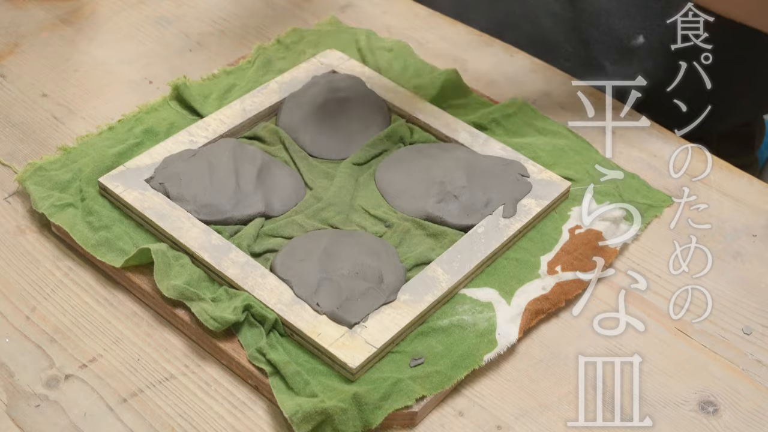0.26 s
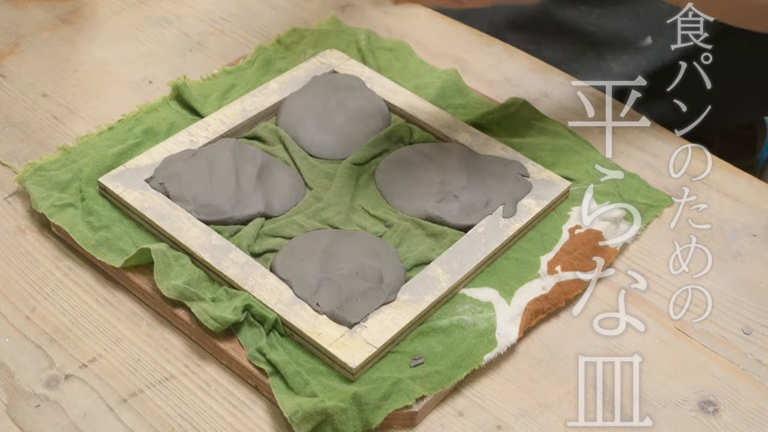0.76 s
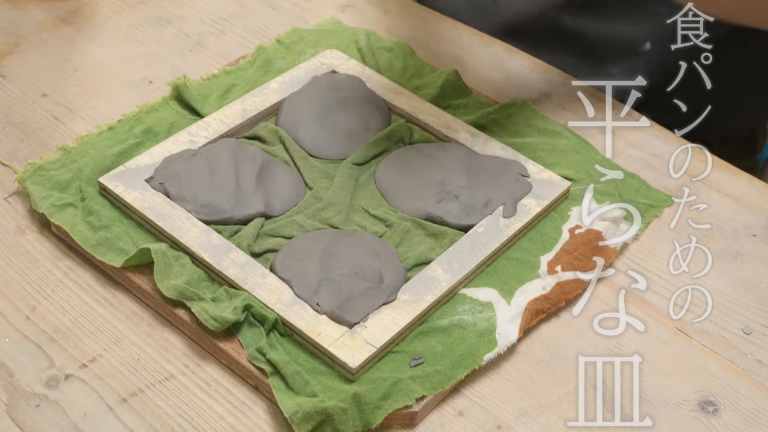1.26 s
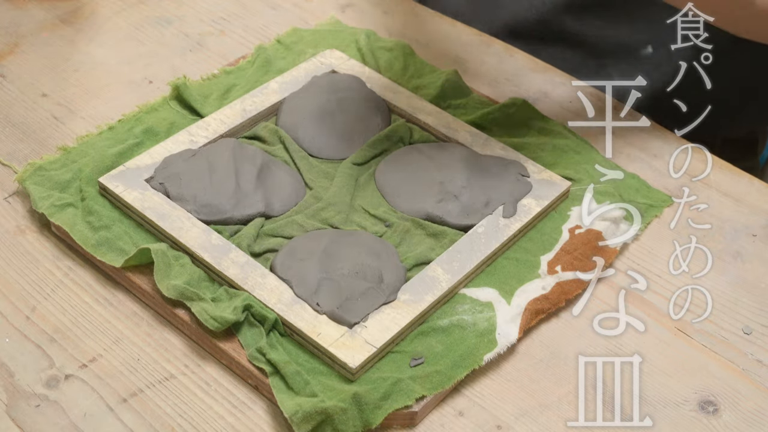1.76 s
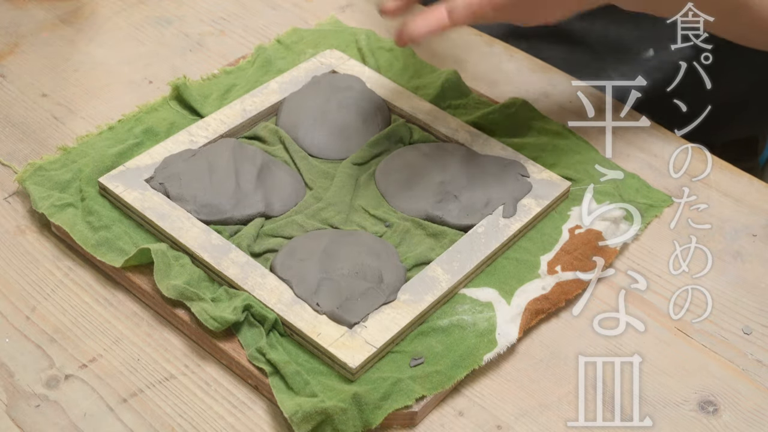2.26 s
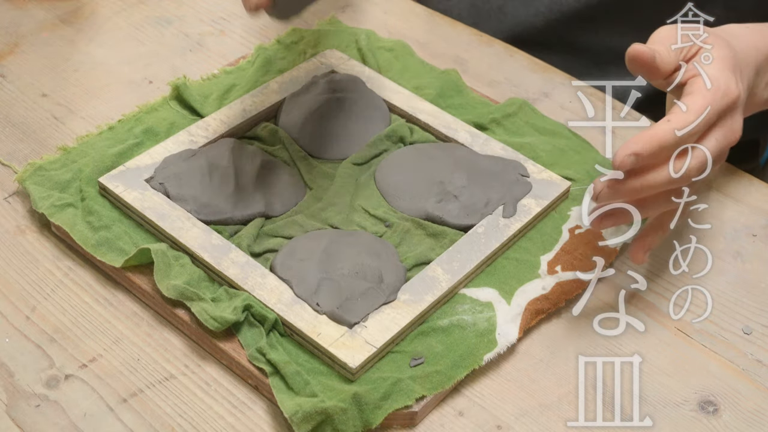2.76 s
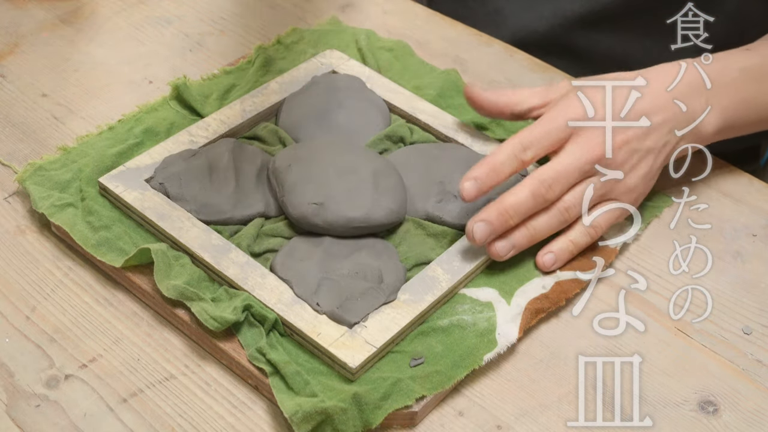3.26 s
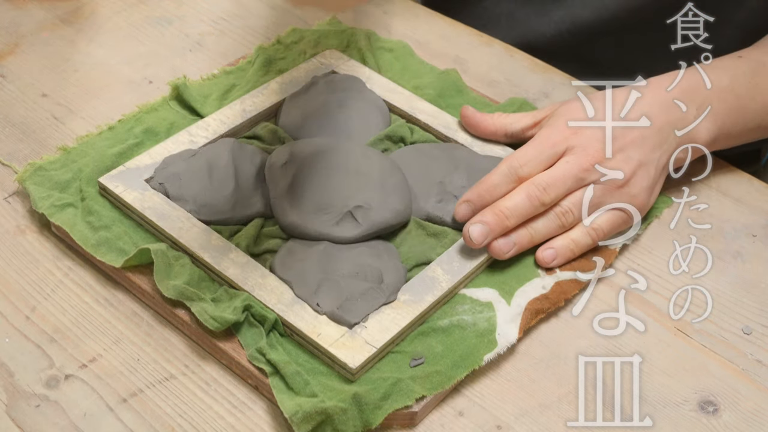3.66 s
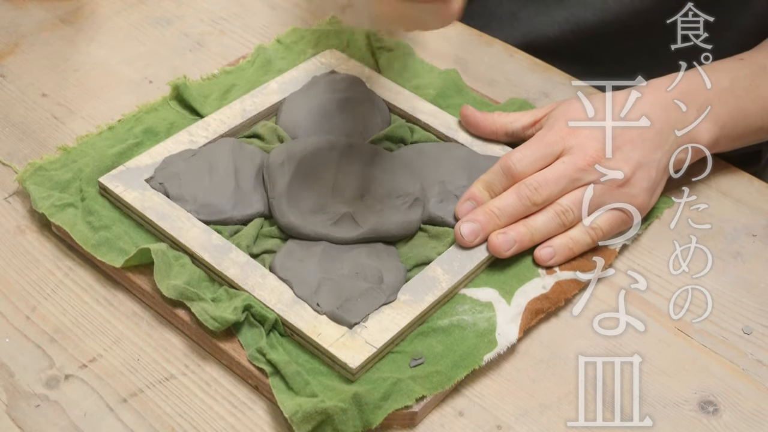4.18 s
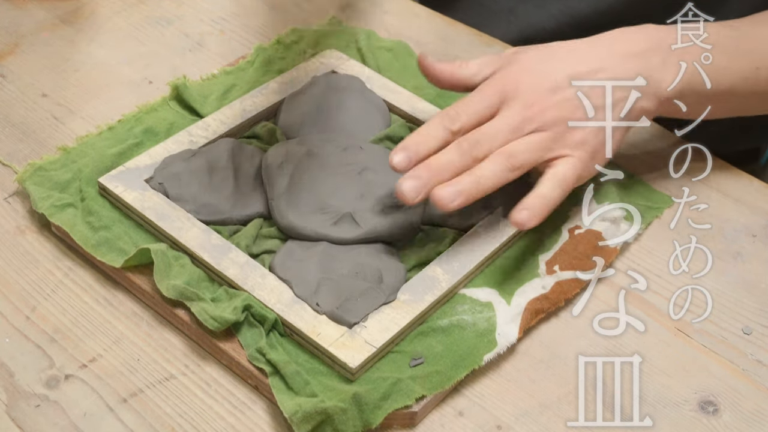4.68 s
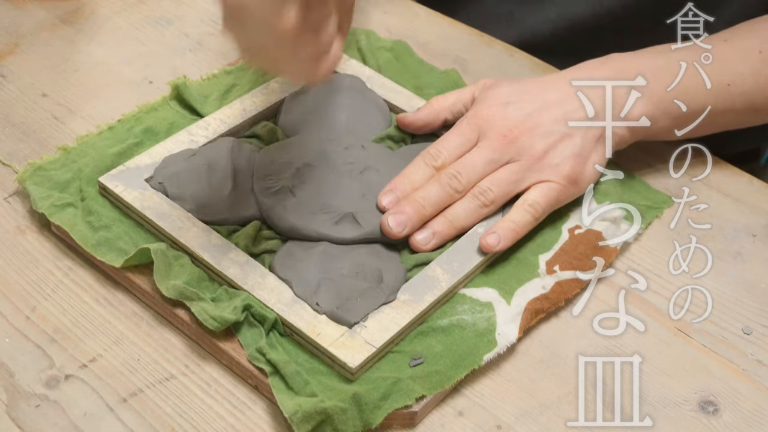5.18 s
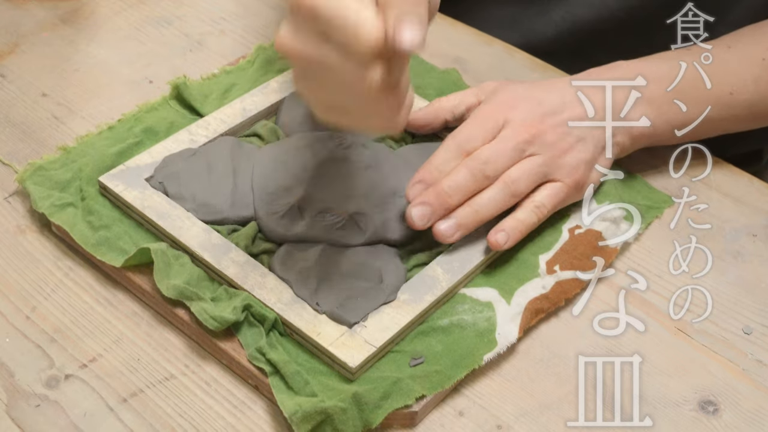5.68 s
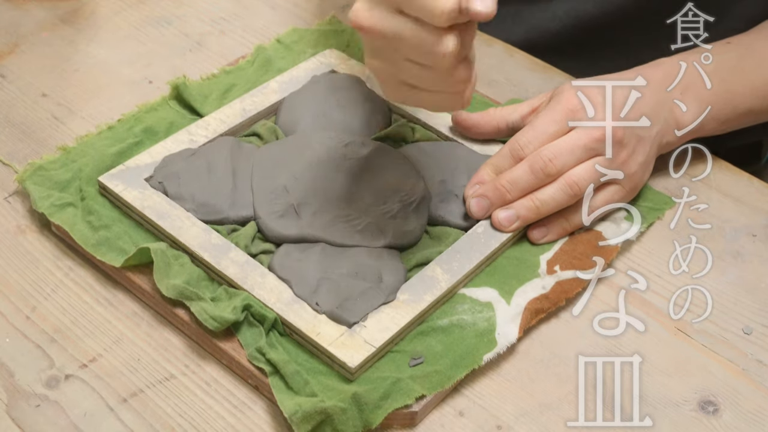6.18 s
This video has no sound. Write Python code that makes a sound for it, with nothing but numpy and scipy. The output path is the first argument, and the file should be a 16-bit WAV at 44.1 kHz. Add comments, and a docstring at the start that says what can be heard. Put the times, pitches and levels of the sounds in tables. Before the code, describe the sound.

In a small, quiet workshop, heard from nearby, bare hands clap a piece of damp clay into shape with a brisk run of cracking slaps, the loudest near the end. Skin peels softly off the clay, and the lump is slapped onto a wooden table. Steady fist blows follow, about four a second, lower and duller than the slaps, each with a wooden boom and a brief chatter of loose objects.

```python
"""Ten sharp slaps shape a lump of soft clay between the palms, over the hush of a small workshop.
Each is air squeezed from a closing gap, coloured by the cavity resonance of the palm; sticky skin peels off.
The lump is slapped onto a wooden table and pounded with the fist: trapped air pops, the table booms in its
normal modes and loose things on it rattle. The cracks overload a limiter, whose recovering gain lets the
room's reverberation swell after each."""
import sys
import numpy as np
from scipy import signal
from scipy.fft import rfft, irfft
from scipy.io import wavfile

SR = 44100
rng = np.random.default_rng(int(sys.argv[2]) if len(sys.argv) > 2 else 0)


def unload_wav(signal):
    """Save mono or channel-first audio to the path in sys.argv[1] as 16-bit WAV at rate SR, clipped to [-1, 1]."""
    wavfile.write(
        sys.argv[1],
        SR,
        np.round(np.clip(np.atleast_2d(signal).T, -1, 1) * 32767).astype(np.int16),
    )


N = 283563
HIT = np.arange(2 ** 15) / SR   # time since a contact [s]
HZ = np.maximum(np.arange(len(HIT) // 2 + 1) * SR / len(HIT), 1)

# room tone: (frequency [Hz], relative spectral density [dB])
AIR_SPECTRUM = [(24, -61), (40, -18), (91, -14.5), (196, -14.5), (277, -13.5), (306, -10), (568, -25.5),
                (728, -18.5), (1060, -31), (4790, -35.5), (6780, -35), (9130, -38.5), (15000, -39.5)]
# palm on the lump; two slaps land in two parts:
# (time [s], level [dB], treble cutoff [Hz], cavity resonance [Hz], cupping [0-1])
PALM_CONTACTS = [(.1060, -10, 12900, 230, 0.72), (.1101, -5.5, 3970, 1870, 1),
                 (.3650, 2.5, 10270, 3897, 0.2), (0.5953, 1.5, 8100, 2430, .65),
                 (.8079, -8, 11000, 2280, 0), (0.8125, -1.5, 5000, 2130, .9),
                 (1.0204, 5.5, 9500, 2330, .35), (1.2284, 4.5, 9000, 2230, 0.64),
                 (1.456, 6, 7160, 1690, 0.25), (1.6750, 6.5, 12000, 2430, 0.21),
                 (1.9174, 17.5, 7345, 3950, 0), (2.1438, 8.5, 13000, 6300, 0.23)]
# reverberation of the workshop: (frequency [Hz], relative spectral density [dB], T60 [s])
ROOM_DECAY = [(64.8, -10.5, 0.16), (138, -1.5, 0.15), (260, 4.5, 0.14), (710, 1.5, 0.17), (1120, -2, 0.15),
              (2300, -1.5, 0.16), (5000, 4.5, 0.15), (9000, 5.5, 0.14), (16200, 3, .14)]
# standing waves and gaps in the reverberation: (frequency [Hz], quality factor [1], boost [dB])
ROOM_RESONANCES = [(234, 9, 4), (290, 8.6, -9), (352, 8.6, 2.5), (820, 5, 5), (1110, 6, -7)]
# sticky skin leaving the clay: (time [s], level [dB], centre frequency [Hz], length [s])
SKIN_PEELS = [(.214, -49.5, 8500, 0.013), (.678, -49, 8500, 0.011), (2.421, -45.5, 2600, .022),
              (2.872, -56, 2400, .003), (3.308, -50.5, 2680, 0.0032)]
# light pats of the hand: (time [s], skin level [dB], thud level [dB])
HAND_PATS = [(2.385, -30.5, -36), (4.757, -46, -34.5), (4.783, -56, -27.5)]
# skin striking the clay on the table: (frequency [Hz], relative spectral density [dB])
SMACK_SPECTRUM = [(400, 7.5), (1500, -2.5), (4000, -4), (7000, -14.5), (12000, -15.5), (16000, -9)]
# normal modes of the loaded table: (frequency [Hz], relative level [dB], T60 [s])
TABLE_MODES = [(43, -9, 0.53), (78, -0.5, 0.12), (87.8, -8, 0.39), (115.1, -11.5, 0.55), (145.7, -6, 0.25),
               (173.5, 1.5, 0.24), (237.7, 2.5, 0.21), (263.5, -11.5, 0.25), (351, -9.5, 0.099),
               (394, -13.5, 0.22), (453.3, -5, 0.17), (540, -4.5, 0.053), (647, -6, 0.03), (761, 0, 0.029),
               (885.6, -5, 0.068)]
# the shaken table top and its load: (frequency [Hz], relative spectral density [dB], T60 [s])
SHUDDER_DECAY = [(60.7, -5, .5), (154, 2, 1), (430, 4, 0.68), (800, -7, 1), (1047, -10.5, 0.7),
                 (3170, -20, 0.62), (6960, -36.5, 0.82), (14760, -29.5, 0.1)]
# fist on the clay: (time [s], push level [dB], knock level [dB], smack level [dB], smack cutoff [Hz])
FIST_BLOWS = [(3.445, -11.5, -14, -10, 9000), (3.771, -13.5, -28, -16.5, 6000),
              (4.031, -14.5, -28.5, -25, 8000), (4.279, -16.5, -13.5, -12, 13000),
              (4.498, -16, -13, -8.5, 6380), (4.8062, -20, -18.5, -40, 10000),
              (5.051, -15.5, -13.5, -18, 11000), (5.315, -16, -14, -12.5, 9000),
              (5.556, -16, -23.5, -11, 14500), (5.792, -15.5, -31.5, -22.5, 9000),
              (6.036, -13, -22, -19, 10000), (6.2684, -16, -30, -24.5, 8000)]
# loose things landing after a blow: (delay [s], relative level [dB], decay time [s], resonance [Hz])
LOOSE_BOUNCES = [(0.015, -20, 0.0083, 12500), (.043, 2, 0.015, 2130), (.068, -6, 0.039, 3700),
                 (.074, -3.5, .01, 6000), (.111, -2, 0.0087, 10000)]
# their chatter: (frequency [Hz], relative spectral density [dB])
RATTLE_SPECTRUM = [(300, 17), (800, 9), (1300, -2.5), (2300, -2), (3200, -7), (5500, -6.5), (10000, -18),
                   (16000, -34)]
# resonances shared by all bounces: (frequency [Hz], quality factor [1], boost [dB])
RATTLE_RESONANCES = [(1770, 10, 5), (2400, 12, 3.5), (2980, 5.8, -2.5), (3560, 12, 5), (5790, 5.9, 0.5),
                     (10000, 18, 0.5)]

CRACK_S, THUD_S = .003, .04   # opening stretches over which levels are set


def from_db(db):
    """Amplitude ratio: tenfold for every 20 dB."""
    return 10 ** (np.asarray(db) / 20)


def at_level(x, db, seconds):
    """Normalisation: the opening stretch of a sound is given this rms level."""
    return x * from_db(db) / np.sqrt(np.mean(x[:int(seconds * SR) + 1] ** 2) + 1e-20)


def add(track, s, x):
    """Superposition: a sound adds to the track from time s on."""
    start = int(s * SR)
    track[start:start + len(x)] += x[:max(N - start, 0)]


def band(x, low_hz, high_hz):
    """Causal band-pass filter."""
    sections = signal.butter(2, [low_hz, min(high_hz, SR * 4 / 9)], "band", fs=SR, output="sos")
    return signal.sosfilt(sections, x + 1e-18)


def low_pass(x, top_hz, order=2):
    """Causal treble cut."""
    return signal.sosfilt(signal.butter(order, min(top_hz, SR * 4 / 9), fs=SR, output="sos"), x + 1e-18)


def high_pass(x, low_hz, order=2):
    """Causal bass cut."""
    return signal.sosfilt(signal.butter(order, low_hz, "high", fs=SR, output="sos"), x + 1e-18)


def resonate(x, hz, q, db):
    """Resonance lifts, or antiresonance lowers, the spectrum around one frequency."""
    return x + (from_db(db) - 1) * signal.lfilter(*signal.iirpeak(hz, q, fs=SR), x + 1e-18)


def colour(x, points):
    """Spectral shaping by a curve through (frequency [Hz], gain [dB]) points."""
    hz, db = np.transpose(points)
    bins = np.maximum(np.arange(len(x) // 2 + 1) * SR / len(x), 1)
    return irfft(rfft(x) * from_db(np.interp(np.log(bins), np.log(hz), db)), len(x))


def dying_noise(rows):
    """Frequency-dependent damping: each half-octave band of noise decays at its own rate."""
    hz, db, t60 = np.transpose(rows)
    white, out = rfft(rng.standard_normal(len(HIT))), 0
    for centre in 40 * 2 ** np.arange(0, 9, .5):
        part = irfft(white * (np.abs(np.log2(HZ / centre)) < 1 / 4))
        level, decay = (np.interp(np.log(centre), np.log(hz), column) for column in (db, t60))
        out = out + part * from_db(level - 60 * HIT / decay)
    return out


def room_tone():
    """Stationary noise: a quiet hush, strongest at low frequencies."""
    return at_level(colour(rng.standard_normal(N), AIR_SPECTRUM), db=-51, seconds=N / SR)


def palm_slaps(fizz_db=-19, thump_db=-24, thump_db_per_db=1.5):
    """Cavity resonance: the more the palm is cupped, the more its hollow rings and the more air puffs."""
    out = np.zeros(N)
    for s, db, top_hz, hollow_hz, cup in PALM_CONTACTS:
        hollow_db = np.interp(cup, [0, 1], [6.5, 14])
        puff_db = np.interp(cup, [0, 1], [-1, 24.5])
        crack = low_pass(air_burst(.003), top_hz, order=4) + from_db(fizz_db) * air_burst(.0012)
        crack = high_pass(crack, low_hz=110, order=1)   # a hand is too small to radiate deep bass
        crack = resonate(crack, hollow_hz, q=3.0, db=hollow_db)
        crack = resonate(crack, hz=320, q=1.1, db=puff_db)
        crack = resonate(crack, hz=2050, q=3.3, db=3)   # the crease of the palm
        crack = workshop(at_level(crack, db, CRACK_S), wet_db=-6.5)
        add(out, s, crack + flesh_thump(thump_db + thump_db_per_db * db))
    return out


def air_burst(seconds, size=1024):
    """Broadband transient: air squeezed out of a closing gap makes a brief, rough click."""
    fade = np.exp(-(HIT[:size] / seconds) ** 4)
    x = rng.standard_normal(size)
    for _ in range(8):   # flatten the spectrum while keeping the click short
        spectrum = rfft(x * fade)
        x = irfft(spectrum / (np.abs(spectrum) + 1e-9))
    return np.pad(x * fade, (0, len(HIT) - size))


def flesh_thump(db, hz=100, decay_s=0.0072):
    """Heavily damped oscillation: the lump jolts the holding hand through one or two dull swings."""
    return from_db(db) * np.sin(2 * np.pi * hz * HIT) * np.exp(-HIT / decay_s)


def workshop(x, wet_db, first_echo_s=0.0032, far_wall_s=0.025, far_wall_db=3.0):
    """Reverberation: dense reflections swell as the far walls answer, in a new pattern at every spot."""
    onset = 1 - np.exp(-(HIT / first_echo_s) ** 2)
    swell = from_db(-far_wall_db * np.exp(-(HIT / far_wall_s) ** 2))
    tail = dying_noise(ROOM_DECAY) * onset * swell
    for hz, q, boost_db in ROOM_RESONANCES:
        tail = resonate(tail, hz, q, boost_db)
    return x + from_db(wet_db) * signal.fftconvolve(x, tail / np.sqrt(np.sum(tail ** 2)))[:len(x)]


def touches():
    """Light impact and adhesion: a pat is a tick of skin and a soft thud; sticky fingers peel free."""
    out = np.zeros(N)
    for s, skin_db, thud_db in HAND_PATS:
        tick = rub(skin_db, low_hz=1500, high_hz=6960, seconds=0.0098)
        thud = rub(thud_db, low_hz=85, high_hz=380, seconds=.015)
        add(out, s, tick + thud)
    for s, db, hz, length in SKIN_PEELS:
        add(out, s, rub(db, hz / np.sqrt(2), hz * np.sqrt(2), length))
    return out


def rub(db, low_hz, high_hz, seconds):
    """Friction noise: a brief brush of skin on clay."""
    brush = rng.standard_normal(len(HIT)) * np.exp(-(HIT / seconds) ** 2)
    return at_level(band(brush, low_hz, high_hz), db, seconds)


def lump_drop(at_s=2.9501, damping_s=0.19):
    """Damped impact: the lump lands flat and all at once, and the palm stays on it and damps the table."""
    out = np.zeros(N)
    drop = clay_blow(push_db=-14.5, knock_db=-13.5, smack_db=-3.5, pop_db=-2,
                     sink_s=.00093, top_hz=4170, push_s=.004)
    add(out, at_s, drop * np.exp(-HIT / damping_s))
    return out


def clay_blow(push_db, knock_db, smack_db, pop_db, sink_s, top_hz, push_s):
    """Inelastic impact: the clay yields and pushes the table; after sink_s the hand bottoms out."""
    push_force = np.sin(np.pi * np.minimum(HIT / push_s, 1)) ** 2
    knock_force = band(1.0 * (HIT == 0), low_hz=215, high_hz=1300)
    smack = workshop(skin_smack(smack_db, top_hz), wet_db=-14)
    boom = workshop(table_ring(push_force, push_db, damping_s=0.31), wet_db=-13)
    pop = workshop(air_pop(pop_db), wet_db=-9)
    knock = workshop(table_ring(knock_force, knock_db, damping_s=0.049), wet_db=-8)
    thud = clay_thud(knock_db - 4)
    shudder = at_level(dying_noise(SHUDDER_DECAY), push_db - 15, THUD_S)
    bottoming = pop + knock + thud + shudder
    return smack + boom + np.pad(bottoming, (int(sink_s * SR), 0))[:len(HIT)]


def skin_smack(db, top_hz, decay_s=0.004):
    """Contact noise: skin meeting clay gives a broadband burst that dies at once."""
    smack = colour(rng.standard_normal(len(HIT)), SMACK_SPECTRUM) * np.exp(-HIT / decay_s)
    return at_level(low_pass(smack, top_hz), db, CRACK_S)


def table_ring(force, level_db, damping_s, scatter_db=3.0, detune=0.022):
    """Normal modes: each striking point excites them in new shares, and the hand's load detunes them."""
    out = 0
    for k, (hz, db, t60) in enumerate(TABLE_MODES):
        radius = from_db(-60 / (t60 * SR))
        angle = 2 * np.pi * hz * (1 + detune * rng.standard_normal()) / SR
        sign = (-1) ** ((k + 3) // 2)   # polarity alternates in pairs of modes
        gain = sign * from_db(db + scatter_db * rng.standard_normal())
        feedback = [1, -2 * radius * np.cos(angle), radius * radius]
        out = out + gain * signal.lfilter([0, np.sin(angle)], feedback, force + 1e-18)
    out = out * np.exp(-HIT / damping_s)   # the hand stays in the clay and damps the ring
    out = high_pass(out, low_hz=32)   # slower motion only shifts the air around the table top
    return at_level(out, level_db, THUD_S)


def air_pop(db):
    """Pressure release: the pocket of air between hand and clay bursts out."""
    return at_level(band(air_burst(0.0037), low_hz=950, high_hz=2500), db, CRACK_S)


def clay_thud(db, decay_s=0.022):
    """Internal damping: the wet mass itself gives a dead, pitchless thud."""
    noise = rng.standard_normal(len(HIT)) * np.exp(-HIT / decay_s)
    return at_level(band(noise, low_hz=210, high_hz=560), db, THUD_S)


def fist_blows(square_knock_db=-14, square_pop_db=-11.5, square_sink_s=.0045):
    """Air entrapment: a squarer fist knocks harder and sinks deeper, so the pop is later and louder."""
    out = np.zeros(N)
    for s, push_db, knock_db, smack_db, top_hz in FIST_BLOWS:
        excess_db = knock_db - square_knock_db
        pop_db = square_pop_db + 1.38 * excess_db
        sink_s = square_sink_s * 2 ** (excess_db / 14)   # doubles with every 14 dB of knock
        add(out, s, clay_blow(push_db, knock_db, smack_db, pop_db, sink_s, top_hz, push_s=0.00699))
    return out


def rattles(usual_push_db=-15, usual_rattle_db=-30.5, db_per_db=1.45, jitter_s=0.0025, rise_share=0.23):
    """Contact chatter: loose things jump at each fist blow and land the louder, the harder the push."""
    out = np.zeros(N)
    for s, push_db, *_ in FIST_BLOWS:
        level_db = usual_rattle_db + db_per_db * (push_db - usual_push_db)
        for delay, db, decay_s, ring_hz in LOOSE_BOUNCES:
            envelope = np.exp(-HIT / decay_s) * (1 - np.exp(-HIT / (rise_share * decay_s)))
            chatter = colour(landings(), RATTLE_SPECTRUM) * envelope
            for hz, q, boost_db in RATTLE_RESONANCES:
                chatter = resonate(chatter, hz, q, boost_db)
            chatter = resonate(chatter, ring_hz, q=4.7, db=7)
            landing_s = s + delay + jitter_s * rng.standard_normal()
            add(out, landing_s, at_level(chatter, level_db + db, decay_s))
    return out


def landings(per_s=1500, grain_db=6.0, buzz_db=-14):
    """Shot noise: separate little contacts of uneven size, over a fine buzz."""
    sizes = rng.standard_normal(len(HIT))
    sizes *= from_db(grain_db * np.minimum(rng.exponential(1, len(HIT)), 3))
    contacts = rng.random(len(HIT)) < per_s / SR
    return sizes * contacts + from_db(buzz_db) * rng.standard_normal(len(HIT))


def scene():
    """Superposition of hands, table and rattle in the room, over quiet room tone."""
    air = room_tone()
    rattle = workshop(rattles(), wet_db=-4.5)
    fingers = workshop(touches(), wet_db=-7.5)
    return (air + palm_slaps() + fingers + lump_drop() + fist_blows() + rattle)[None]


def limiter(x, threshold_db=-3.0, attack_s=.0014, release_db_per_s=339.5):
    """Gain control: the gain dives too late for a crack, then climbs about as fast as the echo dies."""
    power = signal.lfilter([1 / 32], [1, -31 / 32], x ** 2)
    over_db = np.maximum(10 * np.log10(power + 1e-12) - threshold_db, 0)
    release_db = release_db_per_s * np.arange(N) / SR
    reduction_db = np.maximum.accumulate(over_db + release_db, axis=-1) - release_db
    pole = np.exp(-1 / (attack_s * SR))
    return x * from_db(-signal.lfilter([1 - pole], [1, -pole], reduction_db))


def record(dry):
    """Overload: peaks that escape the limiter clip at full scale, and a steep filter cuts the top."""
    clipped = np.clip(limiter(dry), -1, 1)
    treble_cut = signal.ellip(12, .1, 90, 15900, fs=SR, output="sos")
    return signal.sosfilt(treble_cut, clipped)


dry = scene()
out = record(dry)
unload_wav(out)
```